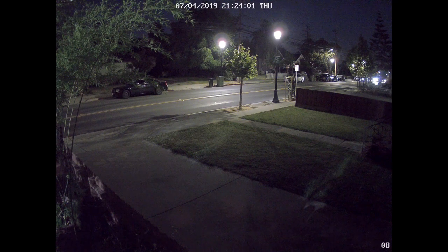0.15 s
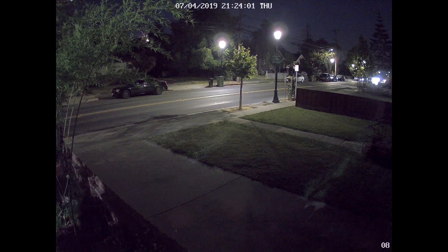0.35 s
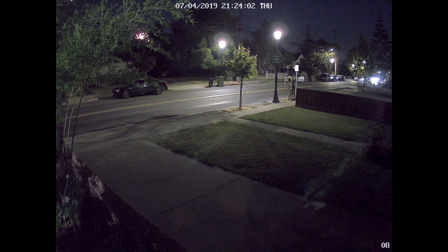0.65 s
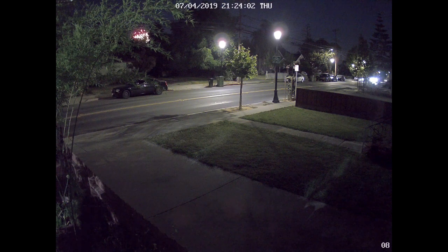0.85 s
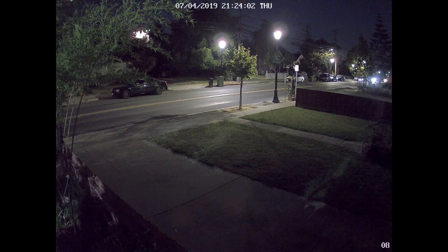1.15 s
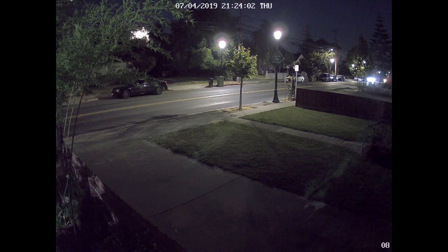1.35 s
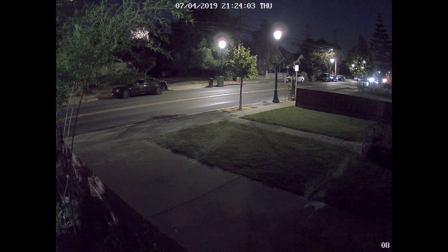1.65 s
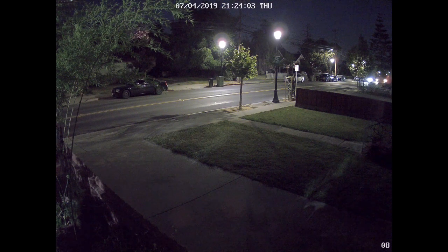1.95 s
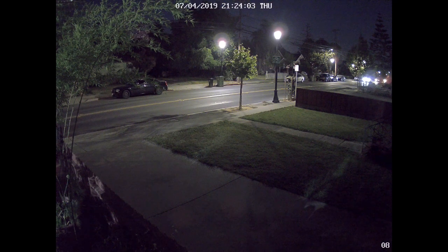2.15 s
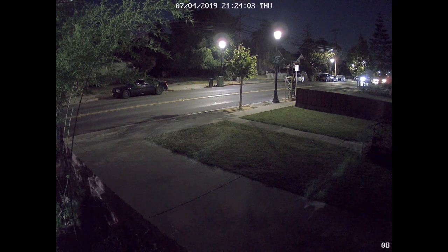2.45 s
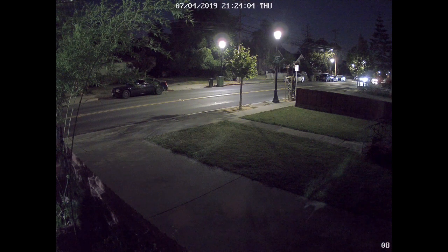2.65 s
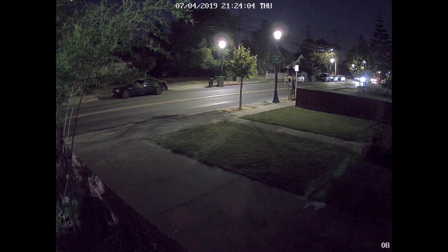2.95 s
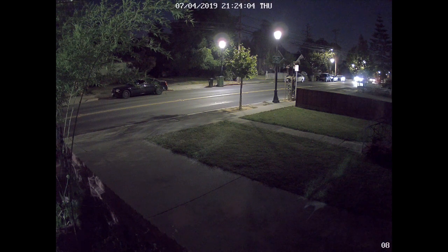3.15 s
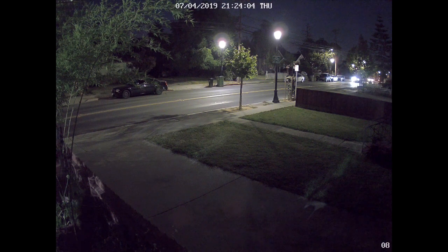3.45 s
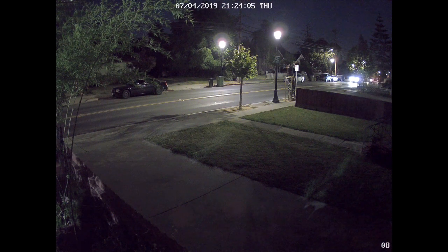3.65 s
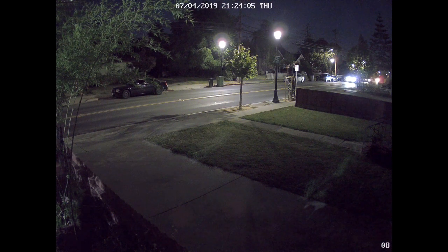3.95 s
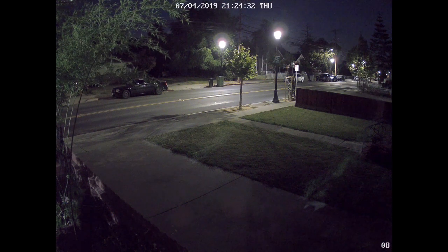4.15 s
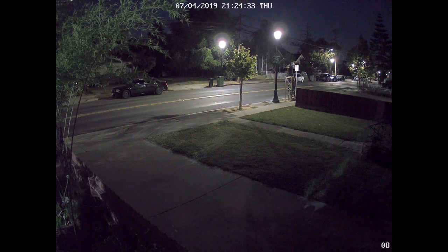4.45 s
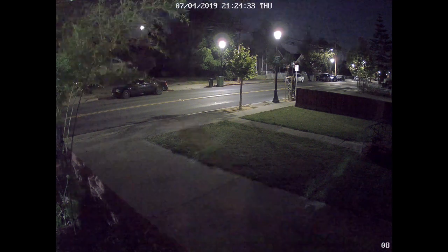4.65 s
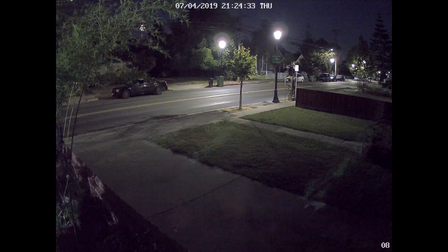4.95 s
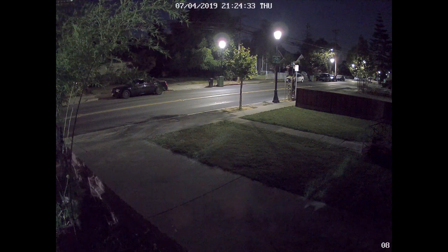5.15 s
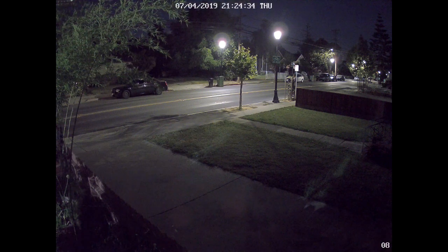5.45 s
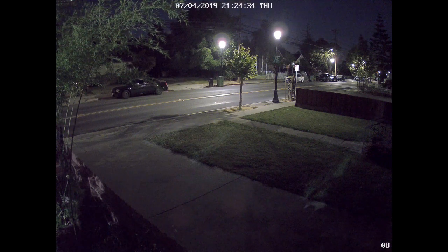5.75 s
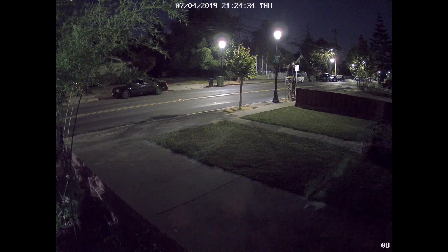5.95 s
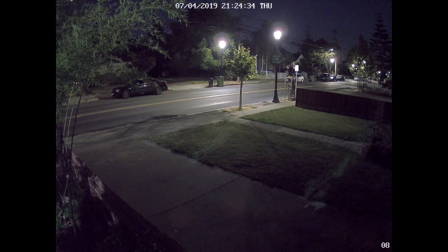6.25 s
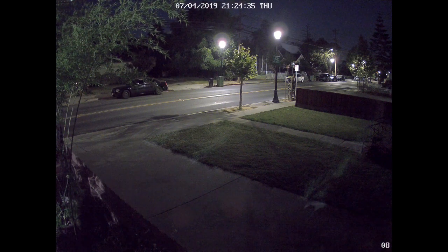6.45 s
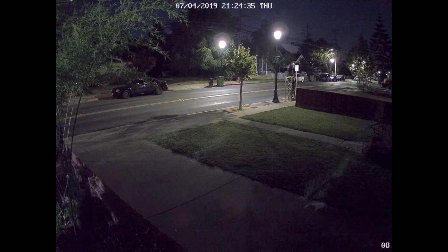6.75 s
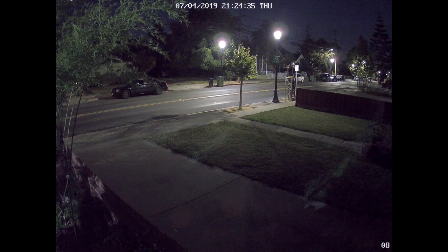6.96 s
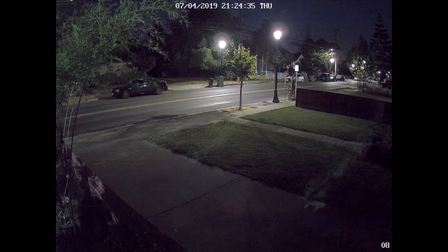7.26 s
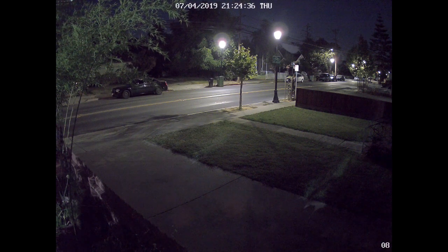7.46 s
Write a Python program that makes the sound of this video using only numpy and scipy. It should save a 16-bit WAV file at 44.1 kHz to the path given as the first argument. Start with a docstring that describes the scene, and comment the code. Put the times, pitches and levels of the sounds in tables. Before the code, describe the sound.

Fireworks boom and echo over a night street, with crackling stars, distant pops, two launch thumps and one huge, deep blast.

```python
"""Fireworks over a night street

Four shells burst and a cloud of stars crackles; then two hooting mortars fire around one huge salute.
Each explosion is an N-shaped shock wave, reflected by house fronts and scattered into a rolling tail.
Far fireworks pop and thud over the rumble of the town. A small, dull microphone clips on the shocks."""
import sys
import numpy as np
from scipy import signal
from scipy.fft import rfft, irfft, next_fast_len
from scipy.io import wavfile

SR = 44100
rng = np.random.default_rng(int(sys.argv[2]) if len(sys.argv) > 2 else 0)


def log_audio(samples):
    """Write samples as a 16-bit WAV file to the path given in sys.argv[1]."""
    # one column per channel
    frames = np.atleast_2d(samples).T
    # limit to full scale, then quantise
    limited = np.clip(frames, -1, 1)
    pcm = np.round(limited * 32767).astype(np.int16)
    wavfile.write(sys.argv[1], SR, pcm)


N = 334719
TIME = np.arange(N) / SR


def from_db(db):
    """Amplitude ratio of a level in decibels."""
    return 10 ** (np.asarray(db) / 20)


def unit_rms(x):
    """Normalisation to unit power."""
    return x / np.sqrt(np.mean(x ** 2) + 1e-20)


def add(out, start_s, sound):
    """Superposition: a sound joins the mix at its start time."""
    at = max(0, round(start_s * SR))
    out[at:at + len(sound)] += sound[:max(0, N - at)]


def decay(t, t60):
    """Exponential decay, by 60 dB in t60 seconds."""
    return from_db(-60 * t / t60)


def at_hz(points, hz):
    """Interpolation of a table on a logarithmic frequency axis."""
    f, value = np.transpose(points)
    return np.interp(np.log(hz + 1e-3), np.log(f), value)


def low_pass(x, hz, order):
    """Butterworth attenuation above a cutoff."""
    return signal.sosfilt(signal.butter(order, hz, fs=SR, output="sos"), x)


def high_pass(x, hz, order):
    """Butterworth attenuation below a cutoff."""
    return signal.sosfilt(signal.butter(order, hz, "high", fs=SR, output="sos"), x)


def coloured(x, spectrum):
    """Spectral shaping of a noise, to unit rms."""
    size = next_fast_len(len(x))
    hz = np.fft.rfftfreq(size, 1 / SR)
    gain = from_db(at_hz(spectrum, hz)) * (hz > 15)
    return unit_rms(irfft(rfft(x, size) * gain, size)[:len(x)])


def noise(size, spectrum):
    """Gaussian noise of a given spectrum and unit rms."""
    return coloured(rng.standard_normal(size), spectrum)


def clicks(size, per_s, spread_db):
    """Shot noise: independent impulses of uneven strength."""
    strength = from_db(spread_db * np.clip(rng.standard_normal(size), -2, 2))
    return rng.standard_normal(size) * strength * (rng.random(size) < per_s / SR)


def drift(size, per_s):
    """Random modulation: straight lines between Gaussian values."""
    return np.interp(TIME[:size] * per_s, np.arange(2000), rng.standard_normal(2000))


def swing(t, hz):
    """A heavily damped oscillation: one soft swing of pressure."""
    cycles = t * hz
    return -np.sin(2 * np.pi * cycles) * cycles ** 2 * np.exp(2 - 2 * cycles)


def shock(ms, edge_hz, bark_db, bark_hz):
    """An N-wave: a nearby wall adds a short bark, and air absorption rounds the edges."""
    t = TIME[:SR // 20]
    length_s = ms / 1000
    wave = (2 * t / length_s - 1) * np.clip((length_s - t) * SR, 0, 1)
    bark = signal.lfilter(*signal.iirpeak(bark_hz, 1.8, fs=SR), wave)
    return low_pass(wave + from_db(bark_db) * bark, edge_hz, order=4)


# Tones of the electronics: f/Hz, level/dB
WHINE_TONES = [(4150, -83), (4370, -92)]

def whine(waver_hz=36):
    """Random frequency modulation makes the thin tones of the electronics waver."""
    out = np.zeros(N)
    for hz, level_db in WHINE_TONES:
        pitch_hz = hz + waver_hz * drift(N, per_s=260)
        out += from_db(level_db) * np.sin(2 * np.pi * np.cumsum(pitch_hz) / SR)
    return out


# Spectrum of the high sizzle: f/Hz, density level/dB
SIZZLE_SPECTRUM = [(2500, -18), (3900, 13), (4700, 5.5), (5600, -1), (7300, -13.5), (8400, -34),
                   (14000, -38.5)]

def sizzle(x, follow_hz=8.1, reference_rms=0.042):
    """Envelope following: a high sizzle swells just after loud, bright bangs."""
    whole = np.sqrt(np.abs(low_pass(x ** 2, follow_hz, order=2)))
    treble = np.sqrt(np.abs(low_pass(high_pass(x, 1500, order=2) ** 2, follow_hz, order=2)))
    drive = np.cbrt(whole * treble ** 2) / reference_rms
    return from_db(-60.5) * np.minimum(drive, 2.1) ** 2.37 * noise(N, SIZZLE_SPECTRUM)


# Modes of the porch and microphone housing: f/Hz, bandwidth/Hz, level/dB re direct sound
PORCH_MODES = [(130, 14, -11), (207, 2, -12.5), (424, 3.8, -7), (1055, 30, -15), (1270, 10, -24.5),
               (1830, 12, -21), (1938, 8.3, -23.5), (2664, 21, -7), (2930, 25, -10.5), (3750, 12, -5)]

def porch(x):
    """Resonance: narrow modes around the microphone ring faintly with every sound."""
    ringing = sum(from_db(db) * signal.lfilter(*signal.iirpeak(hz, hz / width, fs=SR), x)
                  for hz, width, db in PORCH_MODES)
    return from_db(-0.53) * (x + ringing)


def far_echo_envelope(rise_s=0.14, fall_db_per_s=4):
    """Incoherent addition: slow echoes of the bursts from across town sum in power."""
    power = 0
    for start_s, _, _, tail_db in SHELL_BURSTS + SALUTE_BURST:
        age = np.maximum(TIME - start_s, 0)
        swell = from_db(tail_db - fall_db_per_s * age) * np.minimum(age / rise_s, 1)
        power = power + swell ** 2
    return np.sqrt(power)


# Spectra of the town's rumble, murmur and hiss: f/Hz, density level/dB
RUMBLE_SPECTRUM = [(20, -8), (45, 9.5), (70, 3), (130, -2), (220, -17), (400, -50)]
MURMUR_SPECTRUM = [(100, -26), (220, 0), (350, -6), (550, -11.5), (800, -18), (1500, -30.5)]
HISS_SPECTRUM = [(400, -9.5), (800, -3), (1300, 2.5), (2200, -1), (3000, -0.5), (4000, 4.5)]

def town(drop_s=4.115, drop_db=-3):
    """A diffuse field: far explosions blur into a rumble over traffic hiss, and one car draws nearer."""
    # The background is louder from the first burst on, then drops abruptly.
    raised = (TIME > SHELL_BURSTS[0][0]) & (TIME < drop_s)
    echo = far_echo_envelope()
    tyres = from_db(-41.5 - 18 * (drop_s - TIME)) * (TIME < drop_s)
    rumble_gain = np.hypot(from_db(-46.5 + 5 * raised), from_db(-29) * echo)
    murmur_gain = np.hypot(from_db(-55 + 3.5 * raised), from_db(-33.5) * echo)
    hiss_gain = np.hypot(from_db(-56 + 7.5 * raised), tyres)
    rumble = rumble_gain * from_db(drift(N, per_s=59)) * noise(N, RUMBLE_SPECTRUM)
    murmur = murmur_gain * from_db(drift(N, per_s=58)) * noise(N, MURMUR_SPECTRUM)
    hiss = hiss_gain * from_db(0.4 * drift(N, per_s=14)) * noise(N, HISS_SPECTRUM)
    return (rumble + murmur + hiss) * from_db(drop_db * (TIME >= drop_s))


# Distant bursts: t/s, level/dB, centre f/Hz, crack level/dB, T60/s
FAR_POPS = [(0, -47, 324, -48, 0.44), (0.562, -32, 312, -53.5, 0.23), (0.909, -40, 252, -85, 0.16),
            (1.1937, -30, 264, -44.5, 0.24), (1.303, -36, 285, -51.5, 0.57), (1.34, -41, 277, -50.5, 0.22),
            (1.439, -32, 240, -44.5, 0.16), (2.705, -27.5, 320, -48, 0.33),
            (2.762, -24.5, 282.1, -36, 0.19), (3.563, -34, 342, -69, 0.29), (3.829, -36.5, 380, -70, 0.25),
            (3.952, -26, 303, -53.5, 0.48), (4.006, -28, 450, -51, 0.099), (4.278, -45.5, 447, -59, 0.45),
            (4.366, -33.5, 78.6, -85, 0.15), (4.5, -34, 67, -63, 0.15), (4.942, -47.5, 298, -57.5, 0.22),
            (5.144, -36.5, 67, -85, 0.34), (5.188, -38.5, 67.8, -85, 0.16), (5.777, -48, 404, -51, 0.55),
            (7.358, -38, 382, -38.5, 0.28)]
# Spectrum of their crack: f/Hz, density level/dB
CRACK_SPECTRUM = [(400, 1.5), (600, 6), (715, 7.5), (880, -2.5), (1080, 5.5), (1380, 5.5), (1650, -2),
                  (1950, -4), (2200, -8), (2600, -3), (3000, -7.5), (4000, -14)]

def far_pops(ripple_db=3.5):
    """Long-range propagation softens each shock to a swing, a hollow burst, a low boom and a crack."""
    out, t = np.zeros(N), TIME[:SR * 3 // 4]
    grid_hz = np.geomspace(30, 6000, 40)
    edge = from_db(13.5) * shock(ms=0.98, edge_hz=1240, bark_db=-0.5, bark_hz=1250)
    thump = from_db(-12) * swing(t, hz=124)
    tick = 1 + from_db(-23.5) * decay(t, t60=0.03)
    linger = from_db(-22) * decay(t, t60=0.76)
    for start_s, level_db, hz, crack_db, t60 in FAR_POPS:
        width_octaves = 0.75 * (hz / 332) ** 0.092  # low pops are narrower
        hump_db = -12 * np.log2(1 + (np.log2(grid_hz / hz) / width_octaves) ** 2 / 2)
        path_db = ripple_db * rng.standard_normal(len(grid_hz))  # each path between houses differs
        spectrum = np.transpose([grid_hz, hump_db + path_db])
        onset = np.clip(t * hz, 0, 1)  # one cycle long
        burst = coloured(clicks(len(t), per_s=3000, spread_db=-0.5), spectrum) * onset
        crack = coloured(clicks(len(t), per_s=840, spread_db=-0.5), CRACK_SPECTRUM) * tick
        boom = from_db(-6.5) * noise(len(t), RUMBLE_SPECTRUM) * decay(t, t60=0.52)
        body = (from_db(5.5) * swing(t, hz) + burst) * (decay(t, t60) + linger)
        add(out, start_s, from_db(level_db) * (body + thump + boom))
        add(out, start_s, from_db(crack_db) * crack * (decay(t, t60=0.2) + linger))
        add(out, start_s, from_db(crack_db) * edge)
    return out


# Distant thuds: t/s, level/dB, round trip/ms, loss per trip/dB
FAR_THUDS = [(0.5606, -22, 3.5, 1.3), (3.826, -20, 3.43, 0), (3.951, -10.5, 3.2, 0.5),
             (4.008, -10.5, 3.06, 3), (4.322, -13.5, 2.45, 2.5)]

def far_thuds():
    """Flutter echo: a soft shock bounces between two walls and takes on a hollow pitch."""
    out = np.zeros(N)
    for start_s, level_db, trip_ms, loss_db in FAR_THUDS:
        wave = shock(trip_ms, edge_hz=260, bark_db=-2.5, bark_hz=323)
        for trip in range(6):
            add(out, start_s + trip * trip_ms / 1000, from_db(level_db - trip * loss_db) * wave)
    return out


# Spectrum of the echo from trees: f/Hz, density level/dB
TREE_SPECTRUM = [(600, -19), (1400, -7), (2200, 2.5), (2900, 3), (4000, -6)]

def firecracker(start_s=0.177):
    """Backscattering: trees return a bright echo of one thin crack down the street."""
    out, t = np.zeros(N), TIME[:SR // 2]
    crack = from_db(-31) * decay(t, t60=0.035) * noise(len(t), HISS_SPECTRUM)
    echo = from_db(-39) * decay(t, t60=0.33) * noise(len(t), TREE_SPECTRUM)
    add(out, start_s, crack + echo)
    return out


# Spectrum of the echo from a row of houses: f/Hz, density level/dB
STREET_SPECTRUM = [(200, -17), (340, -8), (430, 3), (530, 5.5), (620, -24), (900, -12.5)]

def street_echo(delay_s=0.118, rise_s=0.017):
    """Delayed reflection: a row of houses returns each shell burst as a hollow, drawn-out bark."""
    out, t = np.zeros(N), TIME[:SR // 2]
    swell = t / rise_s * np.exp(1 - t / rise_s)
    for start_s, _, _, tail_db in SHELL_BURSTS:
        bark = coloured(clicks(len(t), per_s=3000, spread_db=0.5), STREET_SPECTRUM)
        add(out, start_s + delay_s, from_db(tail_db - 4) * swell * bark)
    return out


# Spectrum of the crackling stars: f/Hz, density level/dB
STAR_SPECTRUM = [(100, -3.5), (300, -7.5), (600, -1.5), (800, -5), (1500, -3.5), (2200, -6), (3000, -2.5),
                 (4200, 1)]
# Single stars that stand out: t/s, level/dB
STAR_SNAPS = [(2.42, -18), (2.7756, -7), (2.85, -10), (2.8574, -9.5), (2.921, -11), (2.934, -7),
              (3.1107, -16.5)]

def stars(light_s=2.67, full_s=2.843, hold_s=0.13, rise_db_per_s=58, fall_db_per_s=98.5):
    """Shot noise: the tiny shocks of burning stars merge into a frying swell, which the trees echo."""
    catching = from_db(-rise_db_per_s * np.maximum(full_s - TIME, 0))
    fading_s = np.maximum(TIME - full_s - hold_s, 0)
    strength = catching * from_db(-fall_db_per_s * fading_s) * (TIME > light_s)
    per_s = 5000 * np.maximum(strength, 1 / 20) ** 0.52  # denser when louder
    dense = unit_rms(clicks(N, per_s, spread_db=-2.0) / np.sqrt(per_s))
    sparse = from_db(-34) * unit_rms(clicks(N, per_s=70, spread_db=1.0))
    blur = 0.5 * rng.standard_normal(N)
    crackle = from_db(-12.5) * strength * coloured(dense + sparse + blur, STAR_SPECTRUM)
    echo = from_db(-36) * catching * decay(fading_s, t60=0.94) * noise(N, TREE_SPECTRUM)
    out = crackle + echo
    for start_s, level_db in STAR_SNAPS:
        add(out, start_s, from_db(level_db) * shock(ms=0.53, edge_hz=3100, bark_db=-7, bark_hz=690))
    return out


def climbing_shells(attack_s=0.03, hold_s=0.24, fall_db_per_s=93):
    """Combustion noise: each shell leaves its tube with a crack, and its burning tail hisses briefly."""
    out, t = np.zeros(N), TIME[:SR // 2]
    onset = 1 - np.exp(-t / attack_s)
    burning = from_db(-29.5 - fall_db_per_s * np.maximum(t - hold_s, 0)) * onset
    muzzle = from_db(-17) * decay(t, t60=0.012)
    for start_s, *_ in MORTAR_LAUNCHES:
        hiss = coloured(clicks(len(t), per_s=10000, spread_db=4.5), HISS_SPECTRUM)
        add(out, start_s, (muzzle + burning) * hiss)
    return out


# Spectrum of a mortar tube's hoot: f/Hz, density level/dB
HOOT_SPECTRUM = [(200, -21.5), (350, -6), (430, -5), (530, -4.5), (700, -8), (1000, -25.5), (2000, -50)]

def mortar_tubes(attack_s=0.008, hold_s=0.025):
    """Air-column resonance: the gas of each launch gives one low push and the empty tube hoots."""
    out, t = np.zeros(N), TIME[:SR // 5]
    envelope = np.clip(t / attack_s, 0, 1) * decay(np.maximum(t - hold_s, 0), t60=0.04)
    push = from_db(-15.5) * swing(t, hz=150)
    for start_s, shock_db, _, _ in MORTAR_LAUNCHES:
        hoot = from_db(-23.5) * envelope * noise(len(t), HOOT_SPECTRUM)
        add(out, start_s, from_db(shock_db) * (hoot + push))
    return out


def rolling_tail(spectrum, t60s, early_db, early_t60, lumpy_db, build_cycles=0.87):
    """Multiple scattering by trees and houses: an early cluster, then a lumpy decay in each octave."""
    size = 2 ** 17
    t, hz = TIME[:size], np.fft.rfftfreq(size, 1 / SR)
    echoes = rfft(coloured(clicks(size, per_s=5000, spread_db=-1.0), spectrum))
    centres_hz = 40 * 2. ** np.arange(8)
    shared_drift = drift(size, per_s=50)
    out = np.zeros(size)
    for centre, weights in zip(centres_hz, np.eye(len(centres_hz))):
        band = irfft(echoes * at_hz(np.transpose([centres_hz, weights]), hz), size)
        depth_db = lumpy_db * min(1, (400 / centre) ** 0.56)  # the treble scatters more evenly
        build = 1 - np.exp(-t * centre / build_cycles)  # the bass comes last
        out += band * build * from_db(depth_db * shared_drift) * decay(t, at_hz(t60s, centre))
    early = 1 + from_db(early_db) * decay(t, early_t60)
    return out * early * np.clip(t / 0.00021, 0, 1)


def blasts(shots, echoes, spectrum, t60s, edge_hz, bark_db, bark_hz, slap_band_hz, stray_db, **tail):
    """Multipath propagation: the direct shock, duller and thinner slaps from walls, a rolling tail."""
    out = np.zeros(N)
    low_hz, high_hz = slap_band_hz
    for start_s, shock_db, ms, tail_db in shots:
        wave = from_db(shock_db) * shock(ms, edge_hz, bark_db, bark_hz)
        slap = low_pass(wave - low_pass(wave, low_hz, order=1), high_hz, order=2)
        add(out, start_s, wave)
        for delay_s, echo_db in echoes:
            add(out, start_s + delay_s, from_db(echo_db) * slap)
        for distance, weakness in rng.random(size=(24, 2)):  # stray slaps from farther walls
            delay_s = 0.026 + 0.45 * distance
            gain = from_db(stray_db - 12 * weakness) * decay(delay_s, at_hz(t60s, bark_hz))
            add(out, start_s + delay_s, gain * slap)
        add(out, start_s + ms * 1e-3, from_db(tail_db) * rolling_tail(spectrum, t60s, **tail))
    return out


# Launches: t/s, shock level/dB, shock duration/ms, tail level/dB
MORTAR_LAUNCHES = [(5.866, .5, 1.29, -22), (6.9346, 5, 1.38, -20)]
# Reflections from house fronts: delay/s, level/dB
MORTAR_SLAPS = [(.0042, -5), (.0066, -10), (.0858, -14.5), (.0885, -19), (.163, -16)]
# Spectrum of the tail: f/Hz, density level/dB
MORTAR_SPECTRUM = [(30, -2), (100, 0.5), (200, -5.5), (400, -3.5), (700, -5.5), (950, -11), (1200, -22.5),
                   (3300, -23), (4200, -23)]
# Reverberation time: f/Hz, T60/s
MORTAR_DECAY = [(60, 1.38), (500, 1.15), (3000, 1.13)]

def mortars():
    """Sudden gas expansion: each launch radiates a dull thump with a short tail."""
    return blasts(MORTAR_LAUNCHES, MORTAR_SLAPS, MORTAR_SPECTRUM, MORTAR_DECAY,
                  edge_hz=885, bark_db=-9, bark_hz=685, slap_band_hz=(200, 1330), stray_db=-28.5,
                  early_db=-6, early_t60=0.095, lumpy_db=2.5)


# Bursts overhead: t/s, shock level/dB, shock duration/ms, tail level/dB
SHELL_BURSTS = [(1.7919, 0, 1.51, -18.5), (2.1105, 7.5, 1.58, -13), (2.2103, 9.5, 2.1, -12.5),
                (2.2846, 8, 2.1, -13)]
# Reflections from house fronts: delay/s, level/dB
SHELL_SLAPS = [(.0112, -17), (.0168, -17), (.0352, -10), (.105, -22)]
# Spectrum of the tail: f/Hz, density level/dB
SHELL_SPECTRUM = [(30, -17), (90, -2.5), (250, 1), (480, 3), (620, -0.5), (740, -8.5), (1100, -10),
                  (1500, -11), (2200, -14), (3000, -13), (4200, -8)]
# Reverberation time: f/Hz, T60/s
SHELL_DECAY = [(60, 2.96), (400, 1.3), (3000, 2.06)]

def shell_bursts():
    """Shock radiation: the short, steep N-wave of each shell is heard as a sharp report."""
    return blasts(SHELL_BURSTS, SHELL_SLAPS, SHELL_SPECTRUM, SHELL_DECAY,
                  edge_hz=3200, bark_db=-7, bark_hz=850, slap_band_hz=(328, 1400), stray_db=-21.5,
                  early_db=-0.5, early_t60=0.23, lumpy_db=-4)


# The salute: t/s, shock level/dB, shock duration/ms, tail level/dB
SALUTE_BURST = [(6.2765, 16.5, 7.2, -6.5)]
# Reflections from house fronts: delay/s, level/dB
SALUTE_SLAPS = [(.0085, -27.5), (0.0155, -17), (0.032, -15.5), (0.0986, -20), (0.1315, -9.5), (.168, -27),
                (0.297, -30.5)]
# Spectrum of the tail: f/Hz, density level/dB
SALUTE_SPECTRUM = [(25, -16.5), (60, 0), (130, -1), (200, -4.5), (270, -16), (380, -12), (600, -18),
                   (1000, -22.5), (2000, -25.5), (3000, -22), (4200, -20)]
# Reverberation time: f/Hz, T60/s
SALUTE_DECAY = [(60, 2.73), (200, 2.18), (500, 2.2), (3000, 1.74)]

def salute():
    """Blast scaling: a huge burst makes a long N-wave, whose energy lies in the bass."""
    return blasts(SALUTE_BURST, SALUTE_SLAPS, SALUTE_SPECTRUM, SALUTE_DECAY,
                  edge_hz=1440, bark_db=-23.5, bark_hz=770, slap_band_hz=(40, 2380), stray_db=-36.5,
                  early_db=5, early_t60=0.18, lumpy_db=-3.5)


def scene():
    """Linear superposition of the fireworks and the town, in mono."""
    near = shell_bursts() + mortars() + salute()
    background = far_pops() + far_thuds() + firecracker() + town()
    return (near + background + street_echo() + mortar_tubes() + stars() + climbing_shells())[None]


def record(dry, hardness=12, band_hz=4600):
    """Saturation: a narrow-band microphone flattens the shocks, over a faint hiss and a thin whine.
    A high sizzle swells just after loud, bright bangs."""
    dull = low_pass(porch(dry), 3170, order=11)
    ceiling = np.where(dull < 0, 0.91, 0.78)  # positive peaks flatten sooner
    squashed = dull / (1 + np.abs(dull / ceiling) ** hardness) ** (1 / hardness)
    band = signal.sosfilt(signal.ellip(8, 0.2, 60, band_hz, fs=SR, output="sos"), squashed)
    splatter = from_db(-11) * high_pass(squashed, band_hz, order=8)  # distortion above the band
    hiss = from_db(-73) * rng.standard_normal(N)
    fizz = low_pass(splatter + hiss, 7400, order=14)
    sagging = band - low_pass(band, 6, order=1)  # flattened peaks sag towards zero
    clipped = np.clip(sagging + fizz + sizzle(band) + whine(), -1, 1)
    return low_pass(clipped, 15000, order=12)


dry = scene()
out = record(dry)
log_audio(out)
```